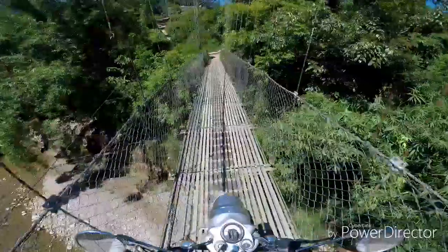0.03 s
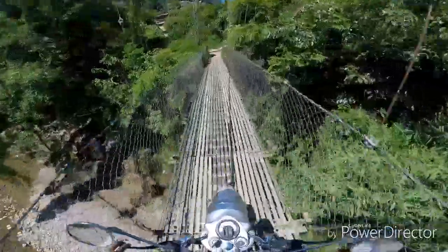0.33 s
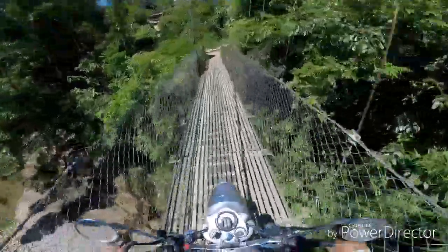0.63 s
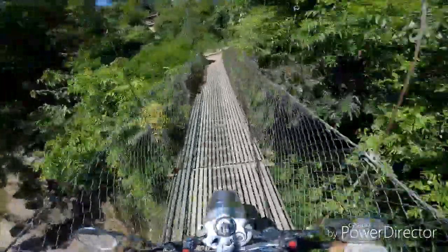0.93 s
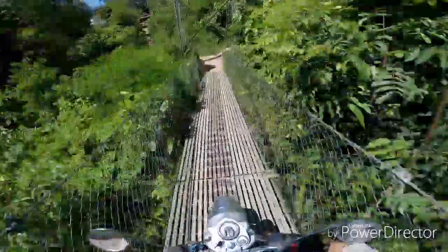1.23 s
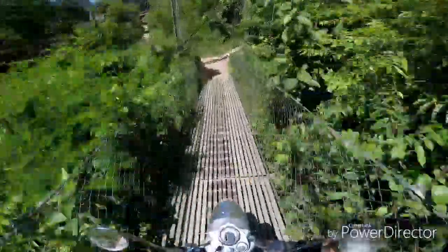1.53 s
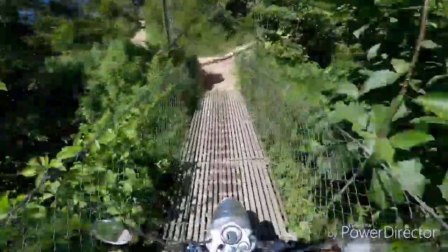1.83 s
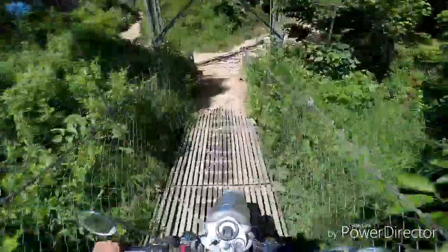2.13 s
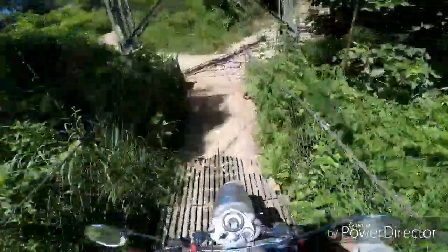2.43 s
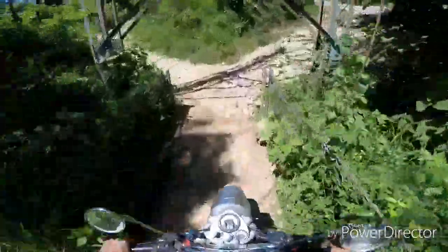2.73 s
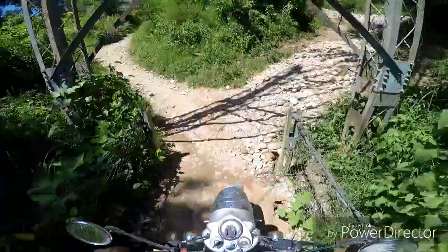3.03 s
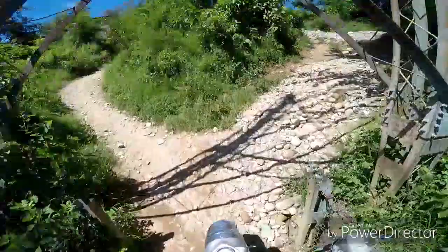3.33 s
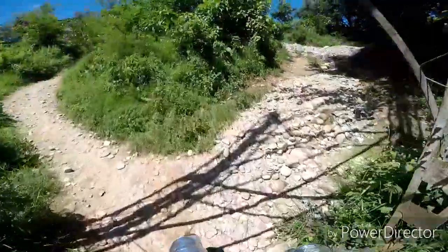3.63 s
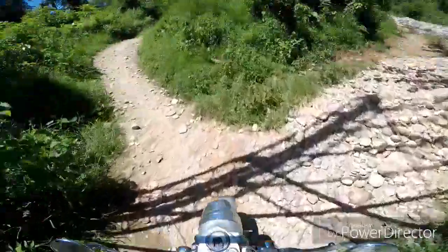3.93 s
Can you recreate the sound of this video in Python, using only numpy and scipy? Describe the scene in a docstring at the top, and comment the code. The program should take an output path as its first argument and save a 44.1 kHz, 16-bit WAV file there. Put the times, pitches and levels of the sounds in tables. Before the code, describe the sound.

A motorcycle coasts over a slatted suspension bridge, the deck rumbling and clattering while wind buffets the microphone at the rider's seat. The rumble fades, and slow engine thumps take over on a dirt path, with knocks and stone clicks.

```python
"""First comes the rumble and clatter of a slatted suspension bridge under the tyres, with wind buffeting
the microphone at the rider's seat of a coasting single-cylinder motorcycle. The deck's drone sinks as
the wheels slow, and something rasps past in short bursts. Off the bridge, on a dirt path, the engine's
separate thumps take over, each ringing the exhaust pipe, with a few knocks and stone clicks."""
import sys
import numpy as np
from scipy import signal
from scipy.fft import rfft, irfft
from scipy.io import wavfile

SR = 44100
rng = np.random.default_rng(int(sys.argv[2]) if len(sys.argv) > 2 else 0)


def generate_wav(sig):
    """Save sig (samples, or channels by samples) to the path in sys.argv[1] as 16-bit PCM at SR."""
    pcm = np.round(np.clip(np.atleast_2d(sig).T, -1, 1) * 32767).astype(np.int16)
    wavfile.write(sys.argv[1], SR, pcm)


N = 176400
TIME = np.arange(N) / SR


def from_db(db):
    """Decibels to gain."""
    return 10 ** (np.asarray(db) / 20)


def rms_one(x):
    """Scale to rms 1."""
    return x / np.sqrt(np.mean(x ** 2) + 1e-20)


def in_time(rows, column=1):
    """One column of a curve, at every sample."""
    rows = np.array(rows)
    return np.interp(TIME, rows[:, 0], rows[:, column])


def drift(rate_hz):
    """A slow random wander; rms 1."""
    step, settle = 40, 2000
    pole = np.exp(-2 * np.pi * rate_hz * step / SR)
    slow = signal.lfilter([1], [1, -2 * pole, pole * pole], rng.standard_normal(N // step + settle + 2))
    slow = rms_one(slow[settle:])
    return np.interp(np.arange(N) / step, np.arange(len(slow)), slow)


def coloured(x, spectrum):
    """Give x a spectrum that falls away beyond its ends; rms 1."""
    hz, db = np.transpose(spectrum)
    f = np.maximum(np.fft.rfftfreq(N, 1 / SR), 1)
    gain = from_db(np.interp(np.log(f), np.log(hz), db))
    skirts = 1 / np.sqrt((1 + (hz[0] / 2 / f) ** 4) * (1 + (f / hz[-1] / 2) ** 4))
    return rms_one(irfft(rfft(x) * gain * skirts, N))


def grains(per_s, spread_db):
    """Random tiny impacts of uneven size."""
    sizes = from_db(spread_db * np.minimum(rng.exponential(1, N), 4)) * rng.choice([-1, 1], N)
    return sizes * (rng.random(N) < per_s / SR)


def impulses(times, gains):
    """Single clicks at the given times."""
    out = np.zeros(N)
    np.add.at(out, np.clip(np.atleast_1d(times) * SR, 0, N - 1).astype(int), gains)
    return out


def ring(clicks, hz, t60):
    """A unit click sets a sine of height 1 ringing."""
    r, w = from_db(-60 / (t60 * SR)), 2 * np.pi * hz / SR
    return signal.lfilter([0, np.sin(w)], [1, -2 * r * np.cos(w), r * r], clicks + 1e-18)


def resonate(x, modes):
    """Let x drive a set of modes; rms 1."""
    return rms_one(sum(from_db(db) * rms_one(ring(x, hz, t60)) for hz, db, t60 in modes))


def burst(start, attack, hold, decay):
    """Attack, hold and exponential release."""
    t = TIME - start
    return np.clip(t / attack, 0, 1) * np.exp(-np.maximum(t - attack - hold, 0) / decay)


def wavering(hz, width_hz):
    """A narrow band of noise round a pitch."""
    phase = 2 * np.pi * np.cumsum(hz * np.ones(N)) / SR
    return drift(width_hz) * np.cos(phase) + drift(width_hz) * np.sin(phase)


def whistles(rows, width_hz):
    """Short unsteady tones that swell and fade."""
    return sum(from_db(db) * np.sin(np.pi * np.clip((TIME - start) / length, 0, 1))
               * wavering(hz, width_hz) for start, length, hz, db in rows)


# Thin high hiss. Each row: frequency in Hz, relative level in dB.
HISS_SPECTRUM = [(5000, -17.5), (7500, 0.5), (9000, 2), (11000, -4), (14500, -20.5)]
# Its rise. Each row: time in seconds, level in dB.
HISS_LEVEL = [(0, -95.5), (2.4, -74.5), (3.1, -60), (3.8, -60), (4, -57.5)]
# Chirps. Each row: start and length in seconds, pitch in Hz, level in dB.
CHIRPS = [(2.78, .06, 8500, -63), (3.1, .05, 7350, -58)]

def faint_treble():
    """A thin, faint high hiss rises late, with two faint high chirps."""
    hiss = coloured(rng.standard_normal(N), HISS_SPECTRUM) * from_db(in_time(HISS_LEVEL))
    return hiss + whistles(CHIRPS, width_hz=74)


# Squeals. Each row: start and length in seconds, pitch in Hz, level in dB.
SQUEALS = [(1.45, 0.091, 1793, -27), (2.03, 0.23, 1744, -35)]

def squeals():
    """Metal squeals briefly, out on the bridge."""
    return whistles(SQUEALS, width_hz=85)


# Rumble of wind and deck. Each row: frequency in Hz, relative level in dB.
RUMBLE_SPECTRUM = [(20, -14.5), (40, 4), (70, -1), (130, -8), (200, -7.5), (300, -15), (500, -29),
                   (1000, -46)]
# Its course. Each row: time in seconds, level in dB.
RUMBLE_LEVEL = [(0, -18), (.4, -16), (.6, -14), (.9, -15), (1.3, -16.5), (1.7, -18.5), (2.05, -23),
                (2.6, -27.5), (2.9, -30.5), (3.2, -21), (4, -24)]
# The deck's drone. Each row: time in seconds, pitch in Hz, level in dB.
DECK_DRONE = [(0, 114.9, -17), (.4, 118.1, -18.5), (.8, 114.4, -29.5), (1.2, 90.7, -22.5),
              (1.75, 86.87, -21), (2.1, 88.85, -35.5), (2.42, 72, -28.5), (2.7, 68.6, -53)]

def wind_and_deck():
    """Wind buffets the microphone; the deck below rumbles and drones, lower as the wheels slow."""
    rumble = coloured(rng.standard_normal(N), RUMBLE_SPECTRUM) * from_db(in_time(RUMBLE_LEVEL))
    hz = in_time(DECK_DRONE)
    drone = np.sin(2 * np.pi * np.cumsum(hz) / SR) + 0.69 * wavering(hz, width_hz=9.2)
    return rumble + rms_one(drone) * from_db(in_time(DECK_DRONE, column=2))


# Clatter of the slats. Each row: frequency in Hz, relative level in dB.
SLAT_SPECTRUM = [(120, 4.5), (260, 3), (500, -1.5), (850, -6), (1200, -8.5), (1700, -23.5), (3000, -29),
                 (6000, -61.5)]
# Its course over the bridge. Each row: time in seconds, level in dB.
SLAT_LEVEL = [(0, -28.5), (.13, -18.5), (.27, -29), (.44, -25), (.51, -16.5), (.6, -17.5), (.76, -18.5),
              (.85, -23), (.94, -24), (1.03, -28), (1.22, -23.5), (1.6, -33), (2.45, -32), (2.8, -57)]

def slats():
    """Loose slats knock in clumps right under the wheels."""
    clatter = coloured(grains(per_s=1200, spread_db=1.5), SLAT_SPECTRUM)
    return clatter * from_db(in_time(SLAT_LEVEL) + drift(24))


# Tyre crunch. Each row: frequency in Hz, relative level in dB.
TYRE_SPECTRUM = [(400, -1.5), (900, -0.5), (1250, 2.5), (1500, 3.5), (1800, 5), (2300, 0.5), (3000, -2),
                 (4000, -11.5), (5800, -22), (8000, -19), (14000, -59)]
# Its course. Each row: time in seconds, level in dB.
TYRE_LEVEL = [(0, -26), (.5, -26), (.61, -19.5), (.79, -21.5), (.85, -27), (.93, -26), (1, -28.5),
              (1.3, -24.5), (1.5, -25.5), (1.72, -30), (1.92, -27), (2.3, -31), (2.9, -36), (3.5, -46),
              (4, -42.5)]
# Fine treble crackle. Each row: frequency in Hz, relative level in dB.
CRACKLE_SPECTRUM = [(1500, -26.5), (3000, 5), (4000, 2), (5800, -4), (9000, -12.5), (14000, -30)]
# Its course. Each row: time in seconds, level in dB.
CRACKLE_LEVEL = [(0, -36.5), (.55, -41), (.75, -32.5), (1, -40), (1.3, -31.5), (1.7, -40.5), (1.85, -36.5),
                 (2.12, -37), (2.27, -51), (2.52, -59), (2.6, -42), (3, -46), (4, -64)]

def tyres():
    """Down at ground level, the rolling tyres crunch and crackle with thousands of tiny impacts."""
    crunch = coloured(grains(per_s=5000, spread_db=0.5), TYRE_SPECTRUM)
    crunch *= from_db(in_time(TYRE_LEVEL) + drift(21))
    crackle = coloured(grains(per_s=3500, spread_db=-1), CRACKLE_SPECTRUM)
    crackle *= from_db(in_time(CRACKLE_LEVEL) + 1.9 * drift(25))
    return crunch + crackle


# Scrapes. Each row: start in seconds, level in dB, attack, hold and decay in seconds, top edge in Hz.
RASPS = [(1.168, -21, 0.015, 0.051, 0.046, 9000), (1.302, -21.5, 0.039, 0.028, 0.06, 6500),
         (1.781, -23.5, 0.00092, 0.0025, 0.017, 4940), (2.946, -22.5, .001, 0.0033, 0.01, 6000),
         (2.962, -31, .002, .004, 0.027, 4970)]
# Their colour. Each row: frequency in Hz, relative level in dB.
RASP_SPECTRUM = [(700, -20), (1400, -1), (2100, 3), (3200, 1.5), (4300, -1), (5800, -8.5), (9000, -3),
                 (14000, -44)]
# The scraped metal. Each row: mode in Hz, relative level in dB, t60 in seconds.
RASP_MODES = [(1725, 2.5, .03), (2294, 4.5, 0.039), (2896, 3, 0.071), (3350, -1, 0.02), (4070, -6, 0.044),
              (5760, -5, 0.087)]

def rasps():
    """Short scrapes pass the seat: dense grains ring metal, each burst with its own brightness."""
    scrape = coloured(grains(per_s=9000, spread_db=-0.5), RASP_SPECTRUM)
    scrape += from_db(-5) * resonate(scrape, RASP_MODES)
    out = np.zeros(N)
    for start, db, attack, hold, decay, top_hz in RASPS:
        dulled = signal.sosfilt(signal.butter(2, top_hz, fs=SR, output="sos"), scrape)
        out += from_db(db) * burst(start, attack, hold, decay) * dulled
    return out


# Knocks of wheels and frame. Each row: start in seconds, level in dB, main pitch in Hz, t60 in seconds.
KNOCKS = [(.125, -17, 573, 0.056), (.353, -20.5, 1100, .04), (.483, -18, 580, 0.045),
          (.508, -17.5, 400, 0.084), (.577, -14, 1215, 0.046), (.765, -18, 586, 0.038),
          (2.418, -17, 75.5, 0.13), (2.927, -26.5, 567, 0.1), (2.944, -25, 634, 0.038),
          (3.148, -20, 524, 0.096), (3.378, -18, 335, 0.21)]
# The rattling frame. Each row: mode in Hz, level against the knock in dB, t60 in seconds.
FRAME_MODES = [(510, -15.5, 0.12), (716, -9.5, 0.08), (761, -12, .08), (983, -16, 0.13),
               (1244, -12.5, 0.046)]

def knocks():
    """Each bump strikes, bounces once, rings its own note and shakes the frame under the rider."""
    bounce_s, bounce_db = 0.012, -0.5
    out = np.zeros(N)
    for start, db, hz, t60 in KNOCKS:
        hit = impulses([start, start + bounce_s], from_db([db, db + bounce_db]))
        out += ring(hit, hz, t60)
        for mode_hz, mode_db, mode_t60 in FRAME_MODES:
            out += ring(hit * from_db(mode_db + rng.normal(0, 4)), mode_hz, mode_t60)
    return out


# Stone strikes. Each row: start in seconds, level in dB, pitch in Hz, t60 in seconds.
STONES = [(3.315, -22.5, 5500, 0.011), (3.962, -21.5, 3900, 0.0056)]

def stones():
    """On the dirt path, stones hit metal with a crack and a short ping."""
    out = np.zeros(N)
    for start, db, hz, t60 in STONES:
        crack = rng.standard_normal(N) * burst(start, attack=1 / SR, hold=0, decay=0.0065)
        out += crack * from_db(db - 1) + ring(impulses(start, from_db(db)), hz, t60)
    return out


# Gas noise and valve clatter. Each row: frequency in Hz, relative level in dB.
GAS_SPECTRUM = [(200, -4.5), (330, -2.5), (480, -6.5), (700, -8), (1150, -13.5), (1500, -22), (2800, -24.5),
                (4500, -30), (6000, -32), (12000, -37)]
# Their course. Each row: time in seconds, level in dB.
GAS_LEVEL = [(0, -34), (2.2, -39), (2.9, -29), (3.15, -24.5), (3.45, -27), (3.7, -28.5), (4, -30.5)]
# Valve gear rattle. Each row: frequency in Hz, relative level in dB.
VALVE_SPECTRUM = [(500, -10), (1200, 5), (2000, -7.5), (3200, -10), (6000, -22)]
# Ringing engine metal. Each row: mode in Hz, relative level in dB, t60 in seconds.
METAL_MODES = [(988, -6.5, 0.13), (1159, 6, .1), (1197.6, 4.5, 0.11), (2380, 0, 0.22), (2860, -7, 0.19),
               (3460, -3.5, 0.058), (4270, -9.5, 0.086), (4640, -15, 0.11), (5500, -9.5, 0.11)]
# Its course. Each row: time in seconds, level in dB.
METAL_LEVEL = [(0, -36), (.7, -34), (1.4, -41.5), (2.4, -39), (3.2, -44.5), (4, -40.5)]

def engine_clatter(cycle, firings_per_s):
    """Close below the seat the valve gear rattles once a cycle; gas noise and metal swell in step."""
    tick_delay_s, tick_decay_s = 0.018, 0.017
    since_tick = (cycle / firings_per_s - tick_delay_s) % (1 / firings_per_s)
    tick = np.exp(-since_tick / tick_decay_s)
    swell = from_db(np.cos(2 * np.pi * (cycle - 0.5)) + 0.5 * tick)
    gas = coloured(swell * grains(per_s=2500, spread_db=1), GAS_SPECTRUM)
    metal = resonate(swell * rng.standard_normal(N), METAL_MODES)
    rattle = coloured(tick * grains(per_s=3000, spread_db=2.5), VALVE_SPECTRUM) * from_db(-42)
    return gas * from_db(in_time(GAS_LEVEL)) + metal * from_db(in_time(METAL_LEVEL)) + rattle


# Strength of the firings. Each row: time in seconds, level in dB.
ENGINE_LOAD = [(0, -9), (.6, -9), (.85, -12), (1.4, -10), (1.75, -12.5), (2.1, -16), (2.92, -17.5),
               (3.05, -12), (3.13, -8.5), (3.35, -4.5), (3.7, -4.5), (4, -7.5)]
# Thumps cut short by a weak second pulse. Each entry: time in seconds.
WEAK_FIRINGS_S = [3.59, 3.84]
# The exhaust pipe. Each row: mode in Hz, level against the pulse in dB, t60 in seconds.
PIPE_MODES = [(296, -17, 0.11), (474, -29.5, 0.043)]

def exhaust_thumps(firings):
    """Each firing is a deep puff and two pulses that ring the pipe as the valve opens and shuts."""
    attack_s, valve_open_s, pitch_spread = 0.009, 0.01812, 0.043
    start_hz, end_hz, sink_s, shut_hz = 195.5, 76.7, 0.0072, 125.5
    load_db = np.interp(firings, *np.transpose(ENGINE_LOAD))
    open_gains = from_db(load_db + rng.normal(0, 1.04, len(firings)))
    weak = np.abs(firings[:, None] - WEAK_FIRINGS_S).min(axis=1) < valve_open_s
    shuts, shut_gains = firings + valve_open_s, open_gains * from_db(-3.5 - 7.5 * weak)
    t = np.arange(SR // 8) / SR
    sinking = 2 * np.pi * np.cumsum(end_hz + (start_hz - end_hz) * np.exp(-t / sink_s)) / SR
    steady = 2 * np.pi * shut_hz * t
    shape = (t / attack_s * np.exp(1 - t / attack_s)) ** 2
    pulses, kicks = np.zeros(N + SR), np.zeros(N)
    for starts, gains, phase in (firings, open_gains, sinking), (shuts, shut_gains, steady):
        for first, gain in zip((starts * SR).astype(int), gains):
            pulses[first:first + len(t)] += gain * shape * np.sin(phase * rng.normal(1, pitch_spread))
        kicks += impulses(starts + attack_s, gains)
    pipe = sum(ring(kicks * from_db(db), hz, t60) for hz, db, t60 in PIPE_MODES)
    puffs = ring(impulses(firings + attack_s, from_db(-16)), hz=52.3, t60=0.088)  # alike at any load
    return pulses[:N] + pipe + puffs


# Engine speed. Each row: time in seconds, firings per second.
ENGINE_SPEED = [(0, 18.2), (.65, 18.2), (.85, 15.4), (1.3, 14.65), (2.2, 14.55), (2.9, 14.05), (3.3, 13.05),
                (4, 11.25)]

def engine():
    """The single cylinder, close to the microphone, slows down, thumping once a cycle."""
    firings_per_s = in_time(ENGINE_SPEED)
    cycle = np.cumsum(firings_per_s) / SR
    cycle -= np.interp(3.428, TIME, cycle)  # one firing falls at this time, in seconds
    firings = np.interp(np.arange(np.ceil(cycle[0]), cycle[-1]), cycle, TIME)
    return engine_clatter(cycle, firings_per_s) + exhaust_thumps(firings)


def scene():
    """The bike and the ground under it, in mono from the rider's seat."""
    return (engine() + wind_and_deck() + slats() + tyres() + rasps() + knocks() + stones() + squeals())[None]


def record(dry):
    """The microphone loses deep bass, rounds peaks and dulls the treble; faint hiss and chirps join."""
    bass_edge_hz, ceiling, treble_edge_hz, treble_leak_db, cutoff_hz = 30, 0.9, 6125, -23.5, 15500
    trimmed = signal.sosfilt(signal.butter(2, bass_edge_hz, "high", fs=SR, output="sos"), dry)
    rounded = trimmed / (1 + (trimmed / ceiling) ** 8) ** (1 / 8)
    f = np.fft.rfftfreq(N, 1 / SR)
    shelf = np.sqrt(1 / (1 + (f / treble_edge_hz) ** 36) + from_db(treble_leak_db) ** 2)
    dulled = irfft(rfft(rounded) * shelf, N)
    return signal.sosfilt(signal.cheby2(12, 70, cutoff_hz, fs=SR, output="sos"), dulled + faint_treble())


dry = scene()
out = record(dry)
generate_wav(out)
```